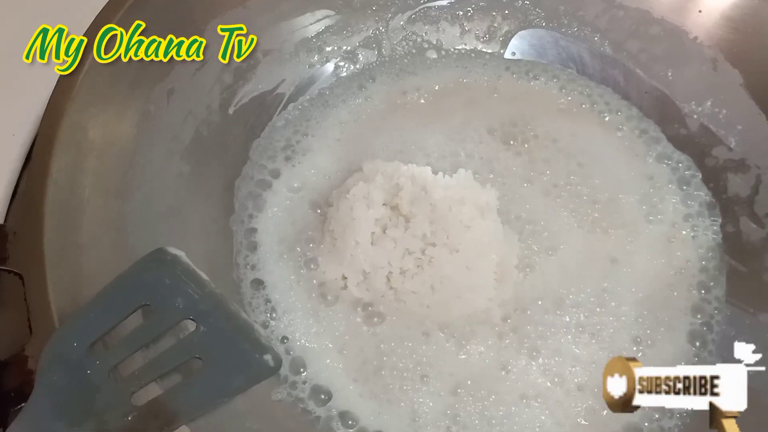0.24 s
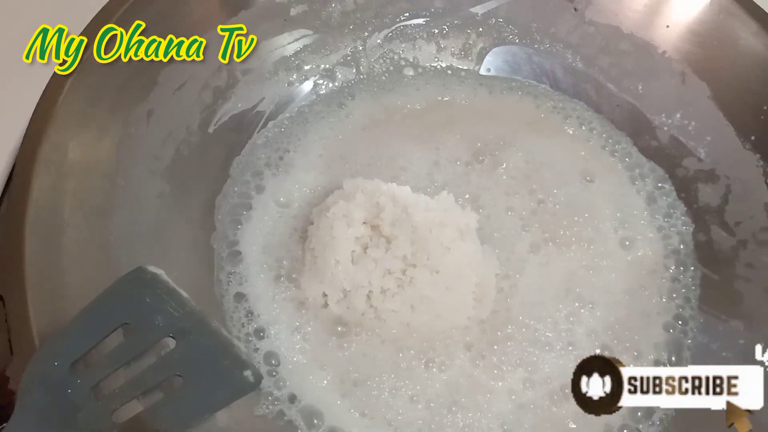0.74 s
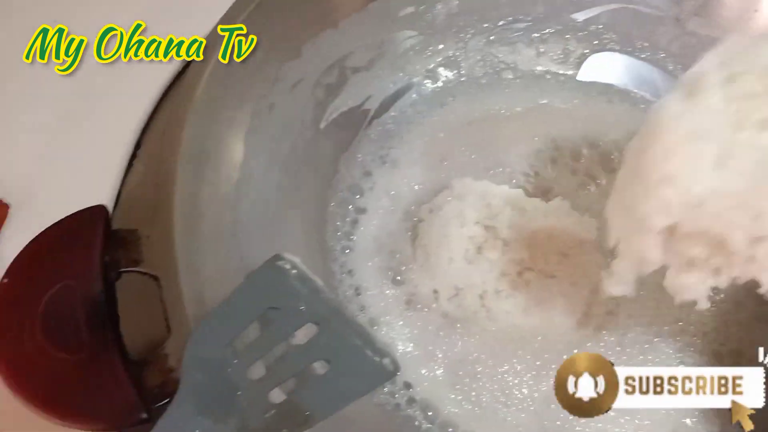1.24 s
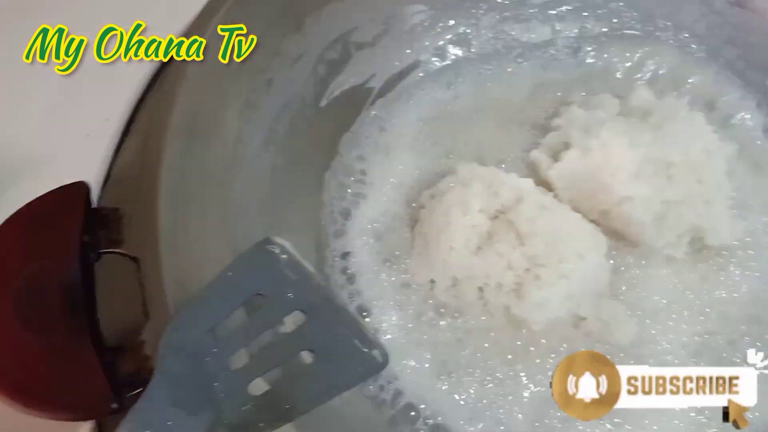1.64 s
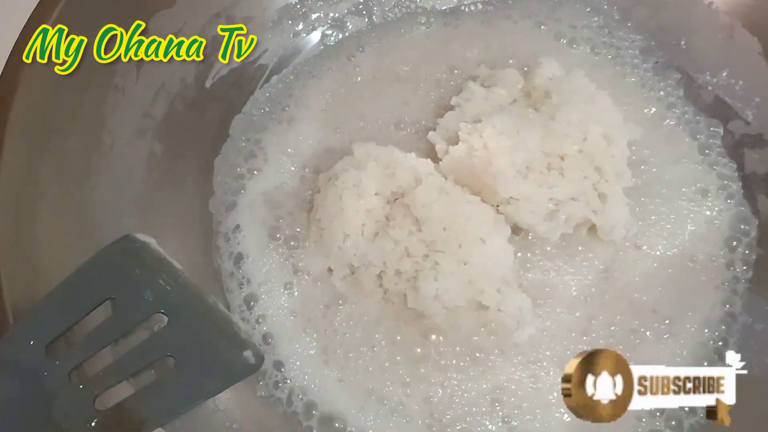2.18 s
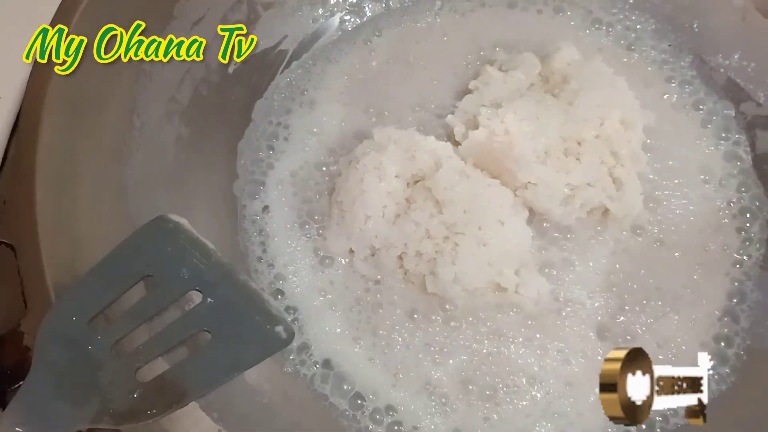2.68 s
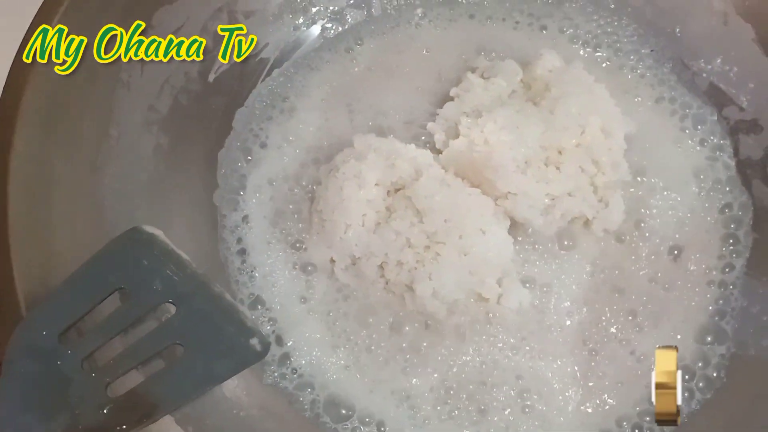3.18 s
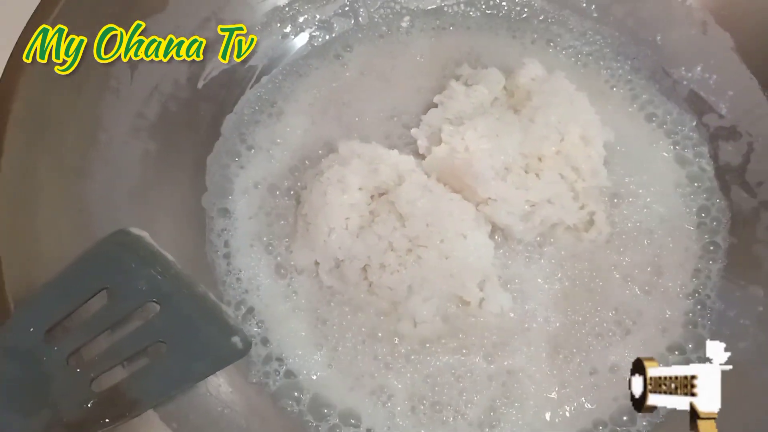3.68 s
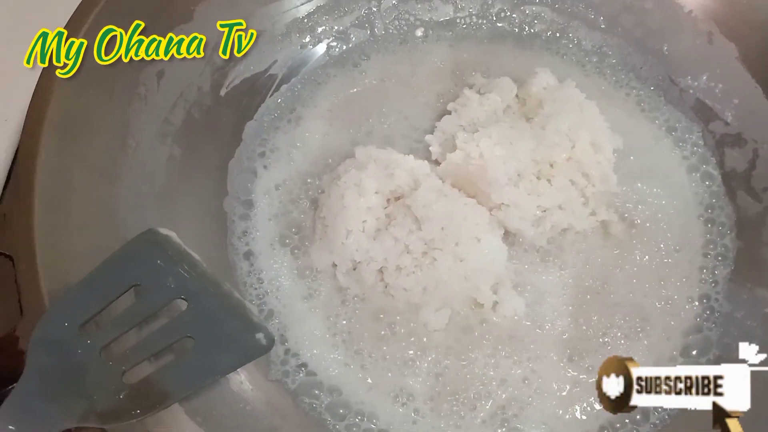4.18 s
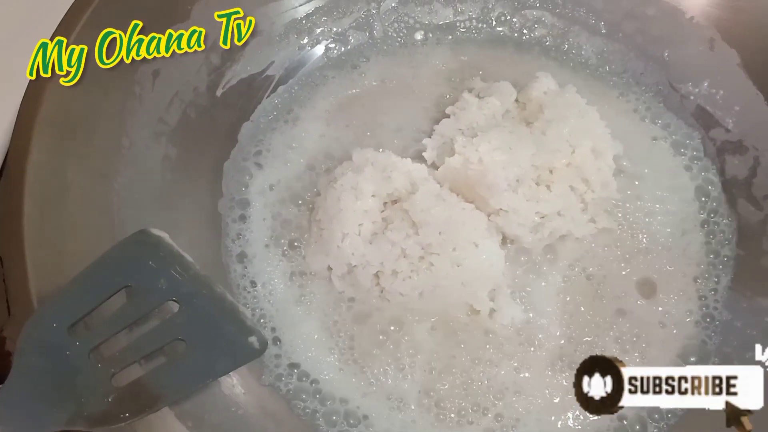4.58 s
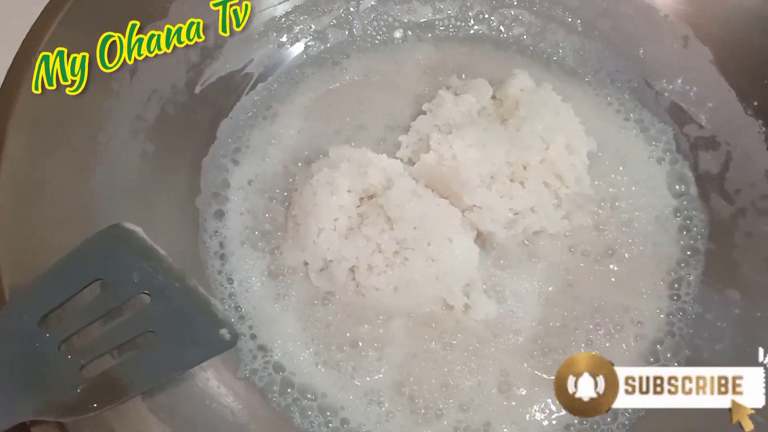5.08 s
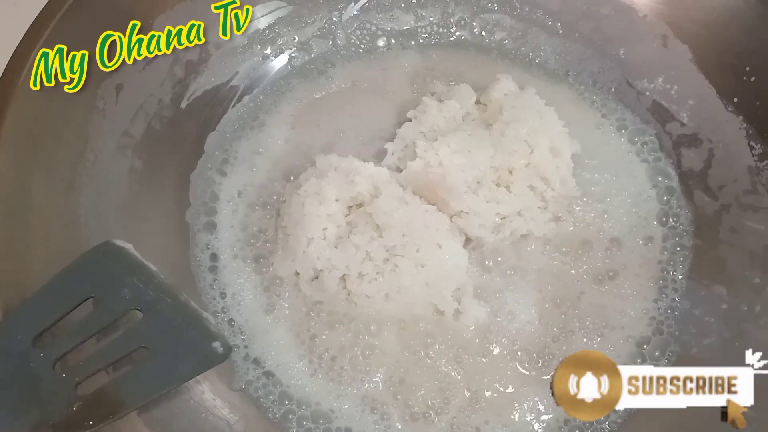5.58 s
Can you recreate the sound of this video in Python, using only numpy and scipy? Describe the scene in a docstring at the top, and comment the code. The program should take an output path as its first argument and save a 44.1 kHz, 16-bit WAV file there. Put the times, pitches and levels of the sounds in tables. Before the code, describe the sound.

Heard close up and leaning left, dense wet bubbling and soft fizz fill a metal pan in a small room with short reflections. A hard thump with rattle comes first, then a soft wet plop and swelling froth, a second thump, gritty scraping, a softer third knock and one dry metallic strike. Bubbling thins and quietens towards the end.

```python
"""Coconut milk boiling in a pan

Coconut milk boils close by in a wide metal pan in a small kitchen: shaped noise gives the low rumble,
swarms of decaying sines the bubbles and foam, and the foam surges when a clump of rice goes in.
Three heavy knocks thump and rattle, as modes and noise bursts; a utensil scuffs metal and strikes
it once. Resonances of the pan's bowl, diffuse reflections and two microphones colour the sound."""
import sys
import numpy as np
from scipy import signal
from scipy.fft import rfft, irfft, next_fast_len
from scipy.io import wavfile
from scipy.ndimage import map_coordinates

SR = 44100
rng = np.random.default_rng(int(sys.argv[2]) if len(sys.argv) > 2 else 0)


def materialize(psi):
    """Save the field psi as 16-bit PCM at rate SR to the path in sys.argv[1].

    A 1-D psi becomes a single channel; in a 2-D psi each row is a channel.
    """
    bounded = np.clip(np.atleast_2d(psi).T, -1, 1)
    quanta = np.round(bounded * 32767).astype(np.int16)
    wavfile.write(sys.argv[1], SR, quanta)


N = 256970  # length in samples


def amp(db):
    """Level: decibels to amplitude gain."""
    return 10 ** (np.asarray(db) / 20)


def unit(x):
    """Normalization: x scaled to rms 1."""
    return x / np.sqrt(np.mean(x ** 2) + 1e-20)


def along(points, hz):
    """Interpolation of (Hz, value) points on a logarithmic frequency axis."""
    f, v = np.transpose(points)
    return np.interp(np.log(hz + 1), np.log(f + 1), v)


def fade(t, t60):
    """Exponential decay: amplitude 60 dB down after t60."""
    return np.exp(-np.log(1000) * t / t60)


def wobble(rate):
    """Random modulation: a smooth curve through `rate` random knots a second."""
    knots = rng.standard_normal(N // 100)
    return map_coordinates(knots, [np.arange(N) * rate / SR], mode="wrap")


def filtered(x, gain):
    """Linear filtering: the spectrum of x times a gain that depends on frequency."""
    m = next_fast_len(N + SR // 2)
    return irfft(rfft(x, m) * gain(np.fft.rfftfreq(m, 1 / SR)), m)[..., :N]


def coloured(x, spectrum):
    """Spectral shaping: x filtered by (Hz, dB) points, then brought to rms 1."""
    return unit(filtered(x, lambda hz: amp(along(spectrum, hz))))


def add(track, s, sound):
    """Superposition: mix a sound into the track at time s in seconds."""
    part = track[:, round(s * SR):][:, :sound.shape[1]]
    part += sound[:, :part.shape[1]]


# Likeness of the sound at the two microphones. Each row: frequency in Hz, left-right correlation.
LIKENESS = [(60, 0.95), (290, 0.98), (640, 0.46), (1400, 0.18), (3100, 0.17), (7000, .03)]


def stereo_angle(hz):
    """Spatial coherence: half the angle whose cosine is the left-right correlation at hz."""
    return np.arccos(np.clip(along(LIKENESS, hz), -1, 1)) / 2


def spread(pair, spectrum):
    """Diffuse field: two unrelated signals blended to stereo, alike in the bass, apart in the treble."""
    def gains(hz):
        angle = stereo_angle(hz)
        return amp(along(spectrum, hz)) * [np.cos(angle), np.sin(angle)]

    mid, side = filtered(pair, gains)
    return unit(np.array([mid + side, mid - side]))


def noise(spectrum):
    """Broadband excitation: coloured stereo noise of rms 1."""
    return spread(rng.standard_normal((2, N)), spectrum)


def bursts(rows, attack):
    """Transient envelope: quick rises that decay, summed as power, from rows (s, dB, t60 s)."""
    power, t = np.zeros((1, N)), np.arange(SR // 2) / SR
    rise = 1 - np.exp(-t / attack)
    for s, db, t60 in rows:
        envelope = amp(db) * fade(t, t60) * rise
        add(power, s, envelope[None] ** 2)
    return np.sqrt(power)


def ring(modes, attack, scatter_db, count=SR // 2):
    """Modal ringing: one blow starts damped (Hz, dB, t60 s) modes, with alternating signs."""
    t = np.arange(count) / SR
    sound = np.zeros((2, count))
    for k, (hz, db, t60) in enumerate(modes):
        size, side = rng.standard_normal(2)
        # higher modes reach the two microphones further out of step
        skew = np.sign(side) * stereo_angle(hz)
        wave = np.sin(2 * np.pi * hz * t + np.array([[skew], [-skew]]))
        sound += (-1) ** k * amp(db + scatter_db * size) * fade(t, t60) * wave
    return sound * (1 - np.exp(-t / attack))


def bubbles(rate, low_hz, high_hz, cycles, size_db, lag, count):
    """Bubble resonance: `rate` bursts a second, each a sine that is 60 dB down after `cycles` turns.

    lag is the greatest delay in seconds between microphones; count is the samples per bubble."""
    draws = rng.random((int(rate * N / SR), 5))
    when, pitch, size, place, sign = draws.T[:, :, None]
    hz = low_hz * (high_hz / low_hz) ** pitch
    scatter = amp(-size_db * np.log(np.maximum(1 - size, .01)))
    # strength in proportion to pitch makes the swarm about white between its limits
    strength = np.sign(sign - .5) * hz * scatter
    index = (when * N).astype(int) + np.arange(count)
    pair = []
    for way in (-1, 1):
        delay = lag * (.5 + way * (place - .5))
        turns = hz * np.maximum(np.arange(count) / SR - delay, 0)
        waves = strength * fade(turns, cycles) * np.sin(2 * np.pi * turns)
        pair.append(np.bincount(index.ravel(), waves.ravel())[:N])
    return unit(np.array(pair))


# Reverberation of the small kitchen. Each row: frequency in Hz, t60 in seconds.
KITCHEN_DECAY = [(150, 0.13), (1000, 0.28), (4000, 0.46), (12000, 0.31)]


def kitchen(x):
    """Diffuse reverberation: reflections as noise whose decay time depends on frequency."""
    wet, step = np.zeros((2, N)), SR // 3
    for start in range(0, N, step):  # each third of a second finds new paths
        hz, t, z = signal.stft(rng.standard_normal((2, SR // 2)), SR, nperseg=256)
        angle = stereo_angle(hz)[:, None]
        z = z * fade(t, along(KITCHEN_DECAY, hz)[:, None]) * [np.cos(angle), np.sin(angle)]
        mid, side = signal.istft(z, SR, nperseg=256)[1]
        tail = np.array([mid + side, mid - side])
        tail = tail / np.linalg.norm(tail[0])
        add(wet, start / SR, signal.fftconvolve(x[:, start:start + step], tail, axes=1))
    return wet


RUMBLE_DB, RUMBLE_FALL_DB_PER_S, RUMBLE_SWAY_DB = -46.5, 0.5, 2.4
# Spectrum of the rumble. Each row: frequency in Hz, relative density in dB per Hz.
RUMBLE_SPECTRUM = [(20, -36), (40, -37), (62, -6), (85, -0.5), (115, -0.5), (170, 3), (230, 0.5),
                   (275, -6.5), (330, -2.5), (390, -15.5), (450, -3), (600, -20.5), (1200, -34)]


def rumble(t):
    """Low-frequency boiling noise: the heated pan bottom rumbles unsteadily and slowly ebbs."""
    level = RUMBLE_DB - RUMBLE_FALL_DB_PER_S * t + RUMBLE_SWAY_DB * wobble(rate=22)
    return amp(level) * noise(RUMBLE_SPECTRUM)


FIZZ_DB, FIZZ_FALL_DB_PER_S = -46, 1.31
FIZZ_HISS_DB = 0  # hiss against fine bubbles
# Spectrum of the foam. Each row: frequency in Hz, relative density in dB per Hz.
FIZZ_SPECTRUM = [(500, -26), (1000, -1.5), (1700, 1), (2500, 0), (3050, -4.5), (3600, -1.5), (4700, -8),
                 (6000, -9), (15000, -15.5)]


def fizz(t, flurry):
    """Collective emission: tiny bubbles of the foam merge with hiss, slowly ebbing."""
    fine = bubbles(rate=1600, low_hz=1200, high_hz=11900, cycles=11, size_db=2.8, lag=0.000504, count=160)
    foam = unit(coloured(fine, FIZZ_SPECTRUM) + amp(FIZZ_HISS_DB) * noise(FIZZ_SPECTRUM))
    return amp(FIZZ_DB - FIZZ_FALL_DB_PER_S * t + 1.6 * flurry) * foam


BUBBLING_DB, CALM_FROM_S, CALM_DB_PER_S = -46, 3.3, 1.5


def bubbling_level(s):
    """Heat balance: the level in dB holds, then falls as the cold rice draws heat from the milk."""
    return BUBBLING_DB - CALM_DB_PER_S * np.maximum(s - CALM_FROM_S, 0)


THIN_FROM_S, THIN_OVER_S = 2.11, 2  # the bubbles grow fewer and higher in pitch
FLURRY_DB = 1.1
# Early and late bubbling spectra. Each row: frequency in Hz, relative density in dB per Hz.
BUBBLING_EARLY = [(300, -18), (550, -10.5), (680, -2), (930, -0.5), (1150, -4), (1700, -11), (2600, -13),
                  (3600, -21.5), (5500, -24)]
BUBBLING_THINNED = [(300, -15), (560, -13), (720, 0), (930, -1.5), (1250, 5), (1700, -3), (2600, -17.5),
                    (3600, -25.5), (5500, -36.5)]


def bubbling(t, flurry):
    """Bubble resonance: a dense swarm crossfades at equal power into a sparser one, in flurries."""
    dense = bubbles(rate=1500, low_hz=486, high_hz=4500, cycles=4.6, size_db=2, lag=0.00019, count=400)
    sparse = bubbles(rate=900, low_hz=435, high_hz=4100, cycles=7.1, size_db=0.5, lag=0.00021, count=400)
    thinned = np.clip((t - THIN_FROM_S) / THIN_OVER_S, 0, 1)
    early = np.sqrt(1 - thinned) * coloured(dense, BUBBLING_EARLY)
    late = np.sqrt(thinned) * coloured(sparse, BUBBLING_THINNED)
    return amp(bubbling_level(t) + FLURRY_DB * flurry) * (early + late)


SLOSH_RISE_S, SLOSH_T60_S = 0.007, 0.44
# The rice lands. The row: start in seconds, level in dB, t60 in seconds.
RICE_LANDING = (1.466, -35.5, .35)
# Wet rice meeting the milk. Each row: frequency in Hz, relative density in dB per Hz.
PLOP_SPECTRUM = [(120, -19), (300, 6), (480, -5.5), (800, -13.5), (2000, -22), (6000, -31), (15000, -24)]
# The milk washes and hisses round the sinking rice. Each row: start in seconds, level in dB.
SURGES = [(1.405, -39.5), (1.468, -32.5), (1.794, -35), (2.121, -36.5), (2.367, -34.5)]
# Surging foam. Each row: frequency in Hz, relative density in dB per Hz.
WASH_SPECTRUM = [(150, -17), (320, -7.5), (550, 1.5), (950, 3.5), (1400, 0.5), (2600, -2.5), (3600, -4.5),
                 (5000, -18.5), (15000, -2.5)]


def sloshes():
    """Impact and collective bursting: the rice plops softly, and crowds of bubbles surge in the foam."""
    crowd = bubbles(rate=1500, low_hz=234, high_hz=9300, cycles=4.1, size_db=-1.0, lag=0.00023, count=500)
    surges = bursts([(s, db, SLOSH_T60_S) for s, db in SURGES], attack=SLOSH_RISE_S)
    plop = bursts([RICE_LANDING], attack=0.0086) * noise(PLOP_SPECTRUM)
    return plop + surges * coloured(crowd, WASH_SPECTRUM)


# further bubbles at random: rate, level over the bubbling with its full range, middle pitch
RANDOM_PER_S, RANDOM_OVER_DB, RANDOM_RANGE_DB, RANDOM_HZ = 45, 11, 9, 1100
CAVITY_DB, CAVITY_T60_S, CAVITY_ATTACK_S = 3.5, .02, .0015
SNAP_DB, RANDOM_SNAP_DB, SNAP_T60_S, SNAP_ATTACK_S = -5, -2, .017, .0006
# Single bubble pops, loud and faint. Each row: start in seconds, level in dB before the cavity and
# snap offsets, pitch in Hz.
SINGLE_POPS = [(0.912, -26.5, 960), (1.425, -30, 960), (1.535, -30, 1030), (1.712, -26, 920),
               (1.789, -22.5, 830), (2.007, -32, 960), (2.051, -27, 920), (2.128, -21, 890),
               (2.177, -26.5, 890), (2.358, -23.5, 635), (2.377, -25, 720), (2.501, -34, 910),
               (2.822, -30, 942), (2.858, -26, 970), (2.911, -39.5, 960), (3.005, -26.5, 930),
               (3.118, -27.5, 970), (3.217, -26, 750), (3.407, -26.5, 867), (3.676, -42, 1240),
               (3.842, -29, 1180), (3.908, -27, 984), (3.942, -30, 1220), (4.189, -45, 1200),
               (4.231, -37, 930), (4.267, -27.5, 1230), (4.391, -34, 1200), (4.441, -35, 890),
               (4.63, -28.5, 950), (4.666, -26.5, 890), (4.681, -25, 880), (4.742, -27, 1250),
               (4.836, -34, 1200), (4.927, -26, 1370), (5.019, -31, 970), (5.115, -28, 1000),
               (5.168, -32, 930), (5.278, -28.5, 925), (5.37, -31, 796), (5.422, -37, 942),
               (5.442, -27.5, 990), (5.525, -31.5, 877), (5.64, -27.5, 1000)]
# A bubble's snapping skin. Each row: frequency in Hz, relative density in dB per Hz.
SNAP_SPECTRUM = [(400, -9.5), (750, 0.5), (1300, 2), (2000, 0), (2700, -9.5), (4000, -11), (6000, -22.5),
                 (15000, -29.5)]


def pops():
    """Cavity resonance: a bubble's skin snaps as noise while its cavity swells into a brief note."""
    random_pops = []
    for when, size, pitch in rng.random((int(RANDOM_PER_S * N / SR), 3)):
        s = when * N / SR
        db = bubbling_level(s) + RANDOM_OVER_DB + RANDOM_RANGE_DB * (size - .5)
        random_pops.append((s, db, RANDOM_HZ * 2 ** (pitch - .5)))
    notes = np.zeros((2, N))
    for s, db, hz in list(SINGLE_POPS) + random_pops:
        cavity = [(hz, CAVITY_DB, CAVITY_T60_S)]
        add(notes, s, amp(db) * ring(cavity, attack=CAVITY_ATTACK_S, scatter_db=2, count=1500))
    snaps = [(s, db + SNAP_DB, SNAP_T60_S) for s, db, _ in SINGLE_POPS]
    snaps += [(s, db + RANDOM_SNAP_DB, SNAP_T60_S) for s, db, _ in random_pops]
    return notes + bursts(snaps, attack=SNAP_ATTACK_S) * noise(SNAP_SPECTRUM)


# Resonances of the air in the bowl. Each row: centre in Hz, width in Hz, gain in dB.
BOWL_RESONANCES = [(758, 52, -3.5), (931, 41, 2), (1220, 90, -7), (1465, 43, -25), (2690, 200, -0.5),
                   (3506, 160, -10)]


def pan(x):
    """Cavity resonance: the direct sound plus band-pass ringing of the air in the pan's bowl."""
    def response(f):
        total = 1
        for hz, width, db in BOWL_RESONANCES:
            damping = 1j * f * width
            total = total + amp(db) * damping / (hz * hz - f * f + damping)
        return total

    return filtered(x, response)


SCUFF_T60_S, SCUFF_GRIT_DB, SCUFF_RING_DB = 0.044, -1.5, -5.5
# Scuffs. Each row: start in seconds, grit in dB before the mix gains, pan's hollow in dB.
SCUFF_CONTACTS = [(3.228, -25, -33), (3.2615, -24.5, -40), (3.269, -21, -40), (3.2768, -18.5, -38),
                  (3.282, -26.5, -33), (3.2905, -32, -33), (3.336, -34, -45), (4.505, -29, -52),
                  (4.513, -31.5, -53), (4.529, -30.5, -43)]
# Grit, and the scuffed pan's body. Each row: frequency in Hz, relative density in dB per Hz.
SCRAPE_SPECTRUM = [(400, -14), (1500, -2), (2000, -1), (2700, 6.5), (3400, 0.5), (4400, 0.5), (5500, -5),
                   (7300, 6), (15000, 4)]
HOLLOW_SPECTRUM = [(400, -27.5), (650, -6), (920, 1), (1100, -5), (1600, -16.5), (2500, -26.5)]
# The scuffed utensil's own modes. Each row: frequency in Hz, relative level in dB, t60 in seconds.
HANDLE_MODES = [(2480, 0.5, .05), (2594, -1.5, 0.047), (2820, 4.5, 0.033), (3980, 0.5, 0.098),
                (4550, 2, 0.06), (4930, 3, 0.046), (6800, -3, 0.048), (7590, 6, 0.023)]


def scuffs():
    """Friction excitation: ragged grit drives the utensil's modes and the hollow of the pan."""
    envelope = bursts([(s, db, SCUFF_T60_S) for s, db, _ in SCUFF_CONTACTS], attack=0.00036)
    grit = envelope * noise(SCRAPE_SPECTRUM) * amp(2.9 * wobble(rate=790))
    handle = ring(HANDLE_MODES, attack=0.00013, scatter_db=1)
    stirred = signal.fftconvolve(grit, handle / np.linalg.norm(handle[0]), axes=1)[:, :N]
    hollow = bursts([(s, db, .1) for s, _, db in SCUFF_CONTACTS], attack=0.0016) * noise(HOLLOW_SPECTRUM)
    return amp(SCUFF_GRIT_DB) * grit + amp(SCUFF_RING_DB) * stirred + hollow


CLACK_DB = -3  # the dry contact against the strike's level
# The utensil's strike. Each row: start in seconds, level in dB.
STRIKES = [(4.5561, -18)]
# The struck metal. Each row: frequency in Hz, relative level in dB, t60 in seconds.
METAL_MODES = [(280, -9.5, 0.087), (374, -10, 0.1), (492, -8, 0.09), (857, -8, 0.085), (910, -8.5, 0.19),
               (1612, -1.5, 0.09), (1832, -5, 0.057), (2413, -6.5, 0.064), (2768, 10.5, 0.039),
               (2810, -21.5, .19), (2900, 0, 0.022), (3110, -2.5, 0.016), (3440, -2, 0.036),
               (3830, -21, 0.027), (3870, -16, .04), (4010, -15, 0.035), (4950, -18, 0.18),
               (6360, -16, 0.05), (6720, -28, 0.17)]
# Steel meeting steel. Each row: frequency in Hz, relative density in dB per Hz.
CLICK_SPECTRUM = [(200, -9.5), (900, 14.5), (1300, -2), (2100, -1), (3000, 1), (4300, 14), (5600, -3),
                  (7000, 2.5), (15000, -9.5)]


def clank():
    """Impact excitation: one dry clack sets the modes of the metal ringing, a little to the left."""
    track = np.zeros((2, N))
    left_right_db = np.array([[1.2], [-1.2]])
    for s, db in STRIKES:
        add(track, s, amp(db + left_right_db) * ring(METAL_MODES, attack=0.0015, scatter_db=2))
    clack = bursts([(s, db + CLACK_DB, .042) for s, db in STRIKES], attack=0.0013)
    return track + clack * noise(CLICK_SPECTRUM)


BODY_DB, CHATTER_DB = -5.5, -10.5  # dull body against the thump; after-chatter against the rattle
RIM_SCATTER_DB = 1
# Contacts of three heavy knocks, each landing and bouncing. Each row: start in seconds, thump, shove,
# rattle, rim and crack in dB, share of the free ringing time, tilt of the thump in dB per octave.
KNOCK_CONTACTS = [(0.431, -19.5, -0.5, -14.5, -13, -11, 0.84, 2),
                  (.438, -30, -11, -27, -18.5, -19.5, 1.2, 2),
                  (0.4552, -25.5, -23, -22, -21, -25, 0.63, -5),
                  (0.482, -31, -22, -25.5, -25, -40, 1.3, -3.5), (0.554, -49, -35, -38, -41, -36, 1.1, 1),
                  (2.6979, -18.5, -3, -14, -12, -15, 1.22, 0.5),
                  (2.71, -26, -15.5, -23.5, -28, -27.5, 1.3, -6),
                  (2.7318, -22.5, -17.5, -19.5, -18, -20.5, 0.72, 3.5),
                  (2.761, -37.5, -28, -26.5, -31, -30.5, 1, -5),
                  (4.0054, -28, -7, -15.5, -13, -37, 0.37, 5.5),
                  (4.015, -26, -6.5, -17.5, -18, -36, 0.95, -6),
                  (4.049, -45.5, -40, -29, -35, -41, 0.53, -7)]
# Modes of the stove, of the quickly damped shove at each contact, and of the pan's jolted rim.
# Each row: frequency in Hz, relative level in dB, t60 in seconds (for the stove, of free ringing).
STOVE_MODES = [(84, -20, 0.35), (161.2, -4.5, 0.2), (191, -11, 0.2), (248, -10, 0.13), (285.6, -2.5, 0.17),
               (343, 3.5, 0.14), (370, -1.5, 0.088), (445.4, -1.5, 0.17), (499, -6.5, 0.18),
               (640, -30, 0.6), (774, -17, 0.69), (898, -3.5, 0.095)]
SHOVE_MODES = [(370, -1.5, 0.017), (694, -10, 0.0066), (932, -14, 0.018)]
RIM_MODES = [(2286, -15.5, 0.069), (2493, -5.5, 0.026), (2587, -5.5, 0.02)]
# Dull body, loose parts and hard contact. Each row: frequency in Hz, relative density in dB per Hz.
THUMP_SPECTRUM = [(40, -55), (90, -27), (160, 4), (350, -2.5), (520, -6), (800, -8.5), (1500, -32)]
RATTLE_SPECTRUM = [(100, -3), (400, 2.5), (650, 8), (950, 6.5), (1400, -1.5), (1900, -6), (2500, -8.5),
                   (3000, -14), (3900, -15), (5300, -29), (7000, -22), (15000, -55)]
CRACK_SPECTRUM = [(150, -2.5), (450, -10), (900, 6.5), (1300, 0), (1900, 9.5), (3000, 2.5), (4000, -0.5),
                  (5600, -13.5), (7000, -3), (15000, -0.5)]


def knocks():
    """Modal excitation: contacts crack, shove and thump the stove, ring the rim and rattle loose parts."""
    times, thump_db, shove_db, rattle_db, rim_db, crack_db, share, tilt = np.transpose(KNOCK_CONTACTS)
    # noise stands for the many duller modes
    body = bursts(zip(times, thump_db + BODY_DB, 0.26 * share), attack=0.009) * noise(THUMP_SPECTRUM)
    for s, thump, shove, rim, length, slope in zip(times, thump_db, shove_db, rim_db, share, tilt):
        stove = [(hz, db + slope * np.log2(hz / 300), t60 * length) for hz, db, t60 in STOVE_MODES]
        add(body, s, amp(thump) * ring(stove, attack=0.00091, scatter_db=1.2))
        add(body, s, amp(shove) * ring(SHOVE_MODES, attack=0.00093, scatter_db=4))
        add(body, s, amp(rim) * ring(RIM_MODES, attack=0.00036, scatter_db=RIM_SCATTER_DB))
    rattle = bursts([(s, db, .035) for s, db in zip(times, rattle_db)], attack=0.00045)
    chatter = bursts(zip(times, rattle_db + CHATTER_DB, 0.19 * share), attack=0.02)
    chatter = chatter * amp(1.2 * wobble(rate=420))  # ragged
    loose = (rattle + chatter) * noise(RATTLE_SPECTRUM)
    crack = bursts([(s, db, .02) for s, db in zip(times, crack_db)], attack=0.00075) * noise(CRACK_SPECTRUM)
    # thin panels radiate little deep bass
    highpass = signal.butter(2, 72, "high", fs=SR, output="sos")
    return signal.sosfilt(highpass, body + loose + crack)


LIQUID_ROOM_DB, KNOCK_ROOM_DB, UTENSIL_ROOM_DB = -8.5, -11.5, -15.5  # sent to the kitchen


def scene():
    """Superposition: the liquid resonates in the pan, and the kitchen answers all but the rumble."""
    t = np.arange(N) / SR
    flurry = wobble(rate=48)  # shared by bubbles and foam
    low = rumble(t)
    liquid = pan(fizz(t, flurry) + bubbling(t, flurry) + sloshes() + pops())
    clinks = scuffs() + clank()
    thuds = knocks()
    sent = amp(LIQUID_ROOM_DB) * liquid + amp(KNOCK_ROOM_DB) * thuds + amp(UTENSIL_ROOM_DB) * clinks
    return low + liquid + thuds + clinks + kitchen(sent)


TOP_HZ = 15650  # nothing passes from here up
# The microphones' response with the resonance of their ports. Each row: frequency in Hz, gain in dB.
PORT_RESPONSE = [(5600, 0.5), (6800, 7.5), (7450, 0), (8100, -17), (10000, -25), (15000, -33.5)]
# Balance of the microphones. Each row: frequency in Hz, left minus right in dB.
LEFT_MINUS_RIGHT = [(60, -0.5), (200, 5), (400, 0.5), (700, 5), (1300, 4.5), (2400, 9), (3300, 8),
                    (4800, -1.5), (6800, 3), (14000, -6.5)]


def record(dry):
    """Transduction: ports colour and mostly favour the left; saturation rounds the strongest peaks."""
    def response(hz):
        balance = np.outer([.5, -.5], along(LEFT_MINUS_RIGHT, hz))
        return amp(along(PORT_RESPONSE, hz) + balance)

    heard = filtered(dry, response)
    rounded = heard / (1 + np.abs(heard / .9) ** 4) ** (1 / 4)
    return filtered(rounded, lambda hz: hz < TOP_HZ)


dry = scene()
out = record(dry)
materialize(out)
```